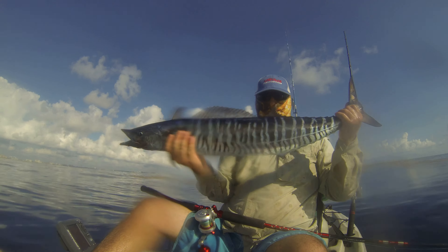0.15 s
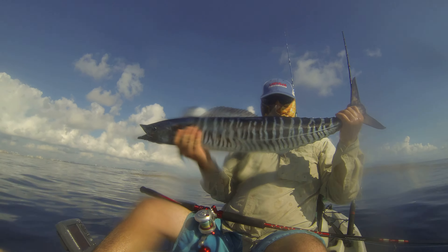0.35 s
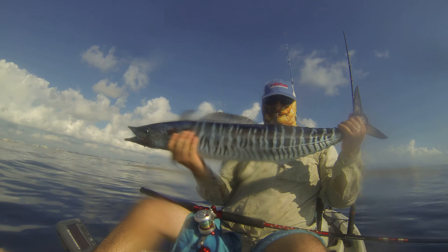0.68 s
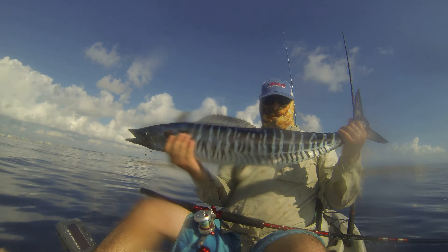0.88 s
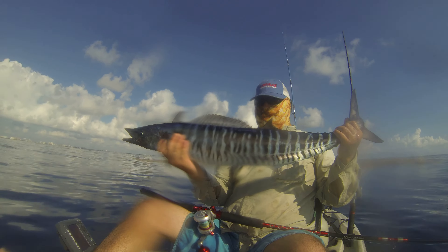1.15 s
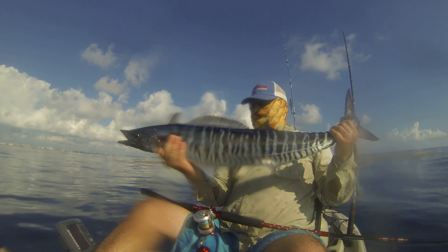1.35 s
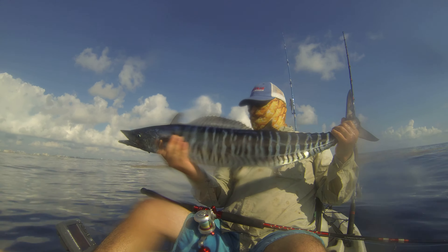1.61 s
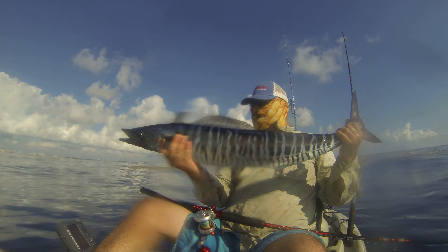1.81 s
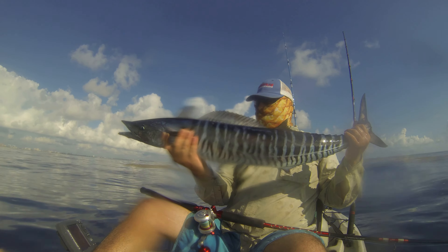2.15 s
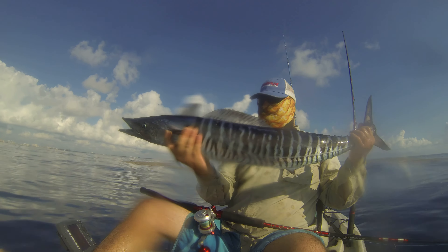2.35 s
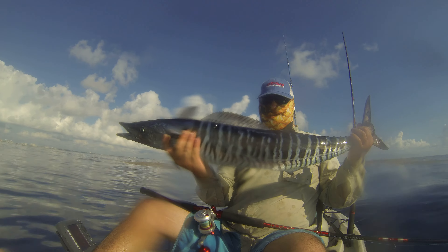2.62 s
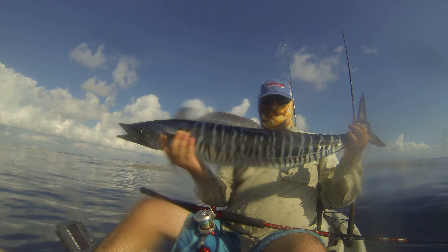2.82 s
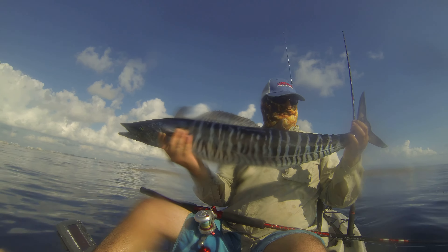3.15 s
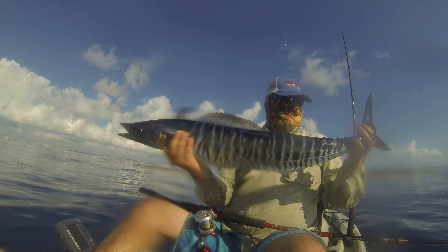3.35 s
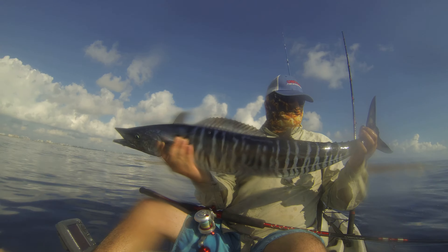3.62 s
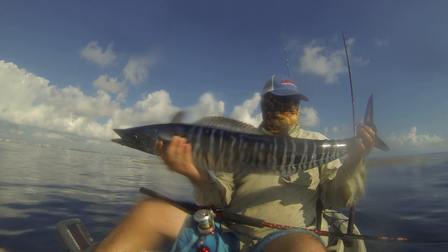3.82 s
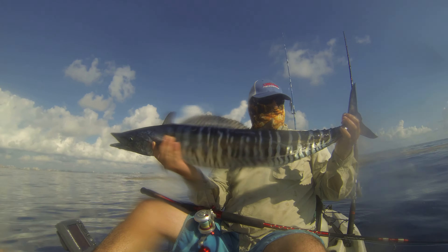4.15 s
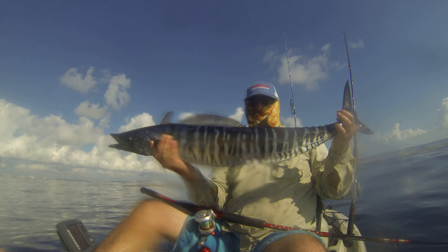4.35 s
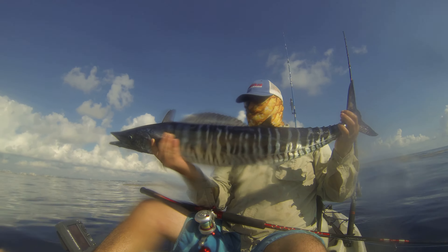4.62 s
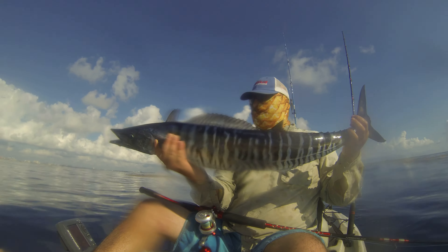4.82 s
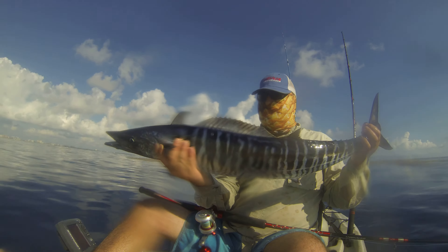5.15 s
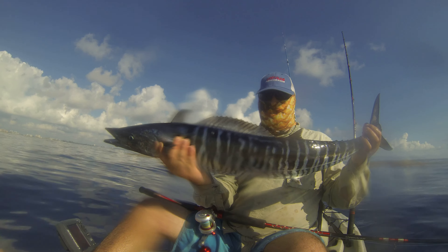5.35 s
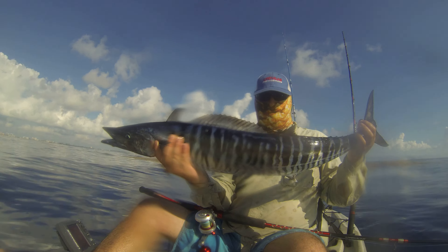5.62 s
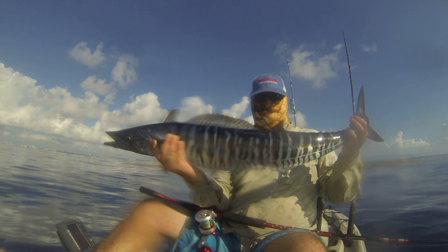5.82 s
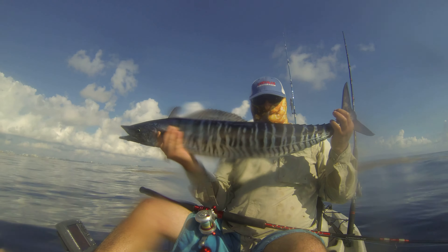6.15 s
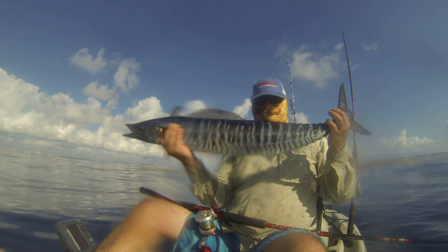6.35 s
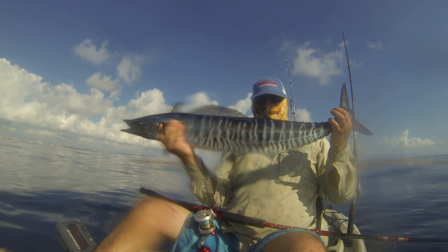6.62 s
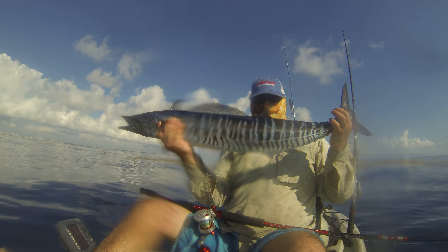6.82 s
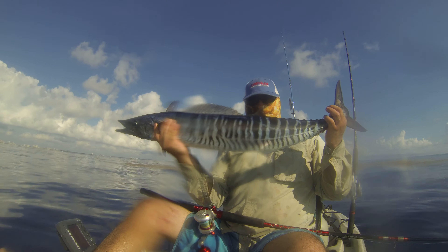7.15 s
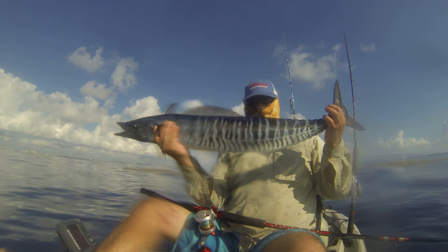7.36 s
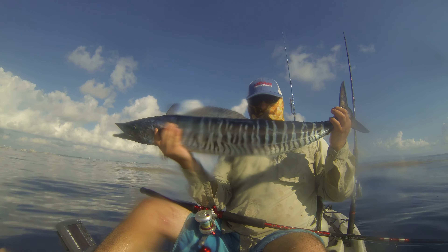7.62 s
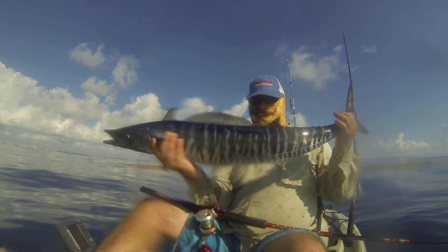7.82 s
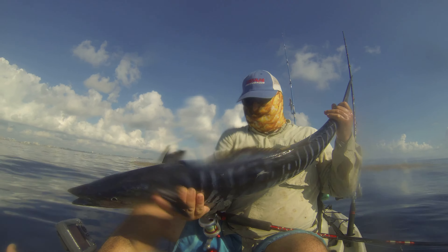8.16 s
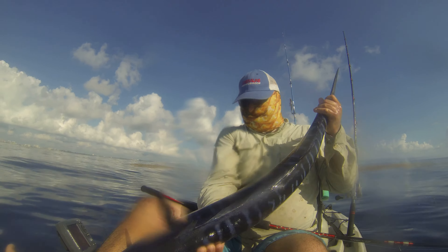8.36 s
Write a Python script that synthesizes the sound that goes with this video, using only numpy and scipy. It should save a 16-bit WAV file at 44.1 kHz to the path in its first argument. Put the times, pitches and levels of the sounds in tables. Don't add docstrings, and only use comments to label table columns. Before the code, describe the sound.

On a small hollow plastic boat at sea, a low motor-like hum runs throughout with faint water lapping. Light knocks come early, then a quieter stretch, then a dense burst of heavy, dull thumps and gear taps around the middle, ending with more bumps and a late knock. The sealed microphone, fixed to the hull, makes everything muffled and bassy, with faint hiss.

```python
import sys
import numpy as np
from scipy import signal
from scipy.fft import rfft, irfft
from scipy.io import wavfile
from scipy.ndimage import uniform_filter1d

SR = 44100
rng = np.random.default_rng(int(sys.argv[2]) if len(sys.argv) > 2 else 0)


def decibels_to_gain(level_db):
    exponent = np.asarray(level_db, float) / 20
    return 10 ** exponent


def master(y):
    cut = np.clip(np.atleast_2d(y).T, -1, 1)
    pcm = np.round(cut * 32767)
    wavfile.write(sys.argv[1], SR, pcm.astype(np.int16))


N = 374380


def rms_one(x):
    return x / np.sqrt(np.mean(x ** 2) + 1e-20)


def in_time(rows):
    s, *columns = np.transpose(rows)
    return [np.interp(np.arange(N) / SR, s, c) for c in columns]


def drift(rate_hz):
    r = np.exp(-80 * np.pi * rate_hz / SR)
    noise = rng.standard_normal(N // 40 + 2002)
    slow = signal.lfilter([1], [1, -2 * r, r * r], noise)[2000:]
    return np.interp(np.arange(N) / 40, np.arange(len(slow)), rms_one(slow - slow.mean()))


def ring(drive, hz, t60_s):
    r, w = decibels_to_gain(-60 / (t60_s * SR)), 2 * np.pi * hz / SR
    return signal.lfilter([0, np.sin(w)], [1, -2 * r * np.cos(w), r * r], drive + 1e-18)


def add(out, s, sound):
    i = round(max(s, 0) * SR)
    out[i:i + len(sound)] += sound[:N - i]


def filtered(x, order, hz, kind="low"):
    return signal.sosfilt(signal.butter(order, hz, kind, fs=SR, output="sos"), x)


FRAME_HZ = 14.985


def gate(spans_s):
    inside = np.arange(N) / SR % (1 / FRAME_HZ)
    return uniform_filter1d(sum(1. * (inside > a) * (inside < b) for a, b in spans_s), size=40)


# (frequency [Hz], density [dB per Hz])
HISS_SPECTRUM = [(100, -36.5), (160, -9), (450, -17), (1000, -20), (1600, -27), (3000, -31.5), (5000, -36),
                 (7500, -39), (10000, -43.5), (12800, -46.5), (13300, -42.5), (14000, -51.5),
                 (15600, -60.5)]
# (start [s], end [s])
WHINE_SPANS = [(.0305, .0472), (.0498, .0668)]
BUZZ_SPANS = [(.017, .0235), (.0245, .031)]
# (frequency [Hz], level [dB rms])
WHINE_LINES = [(7472, -71), (14947, -73.5)]
HISS_DB = -71
BUZZ_HZ, BUZZ_WIDTH_HZ, BUZZ_DB, BUZZ_LIFT_DB = 3255, 350, -79, 6


def camera():
    hz = np.maximum(np.arange(N // 2 + 1) * SR / N, 1)
    table_hz, table_db = np.transpose(HISS_SPECTRUM)
    spectrum = rfft(rng.standard_normal(N)) * decibels_to_gain(np.interp(np.log(hz), np.log(table_hz), table_db))
    hiss = irfft(spectrum, N) / np.std(irfft(spectrum * (hz > 1600), N))

    edges_hz = [BUZZ_HZ - BUZZ_WIDTH_HZ / 2, BUZZ_HZ + BUZZ_WIDTH_HZ / 2]
    buzz = rms_one(filtered(rng.standard_normal(N), 1, edges_hz, "band"))
    buzz *= decibels_to_gain(BUZZ_DB + gate(BUZZ_SPANS) * (BUZZ_LIFT_DB + 1.8 * drift(20)))

    t = np.arange(N) / SR + 0.0022 * np.cumsum(drift(25)) / SR
    whine = sum(decibels_to_gain(db + 1) * np.sin(2 * np.pi * f * t) for f, db in WHINE_LINES)
    return decibels_to_gain(HISS_DB) * hiss + buzz + gate(WHINE_SPANS) * whine


# (time [s], impeller tone [dB], shaft tone [dB])
PUMP_LEVELS = [(0, -38, -59), (.4, -47.5, -56), (.85, -48, -50), (1.15, -35, -45), (1.4, -42.5, -47),
               (1.7, -43, -40.5), (2, -44, -52), (2.75, -43, -52), (2.9, -48, -50.5), (3.7, -51, -54.5),
               (4.5, -47.5, -48.5), (5.6, -44.5, -49.5), (6.25, -46, -45), (6.4, -42.5, -58),
               (6.95, -35.5, -45), (7.3, -39.5, -47), (7.5, -42, -48), (8.49, -45.5, -46)]
# (multiple of shaft speed, level [dB])
PUMP_HARMONICS = [(3, -10), (4, -25.5), (5, -22.5), (6, -33.5), (7, -24.5), (8, -26), (9, -30.5), (10, -30),
                  (11, -45), (12, -31.5), (13, -36.5), (14, -33)]
SHAFT_HZ = 43.94
PUMP_BUZZ_DB, PUMP_BUZZ_FOLLOWS, IMPELLER_MEAN_DB = -43.5, .2, -40


def pump():
    impeller_db, shaft_db = in_time(PUMP_LEVELS)
    buzz_db = PUMP_BUZZ_DB + PUMP_BUZZ_FOLLOWS * (impeller_db - IMPELLER_MEAN_DB)
    turn = 2 * np.pi * np.cumsum(SHAFT_HZ + 0.067 * drift(2.5)) / SR
    buzz = np.zeros(N)
    for k, db in PUMP_HARMONICS:
        waver_db = min(k - 2, 3) * drift(2.0)
        buzz += decibels_to_gain(db + waver_db) * np.sin(k * turn + rng.uniform(0, 6.77))
    shaft = decibels_to_gain(shaft_db) * np.sin(turn)
    impeller = decibels_to_gain(impeller_db) * np.sin(2 * turn + 0.92)
    return np.sqrt(2) * (shaft + impeller + decibels_to_gain(buzz_db) * buzz)


# (frequency [Hz], level [dB], t60 [s])
BELLY_MODES = [(150, 9.5, 0.13), (231, 0, 0.16), (258, 0.5, 0.16)]
WALL_MODES = [(319, 12.5, 0.059), (332.4, 11, 0.06)]
HATCH_MODES = [(417, -2, 0.074), (480, -1, 0.12)]
MID_MODES = [(600, 0.5, 0.044), (722, -5, 0.069), (830, 0.5, 0.017)]
FITTING_MODES = [(937, 2, 0.062), (1016, 2, 0.055), (1238, 1.5, 0.036), (1360, -7.5, 0.02)]
# (time [s], slaps [dB], heave [dB])
WATER_LEVELS = [(0.0, -47, -61), (0.4, -54, -58.5), (1.13, -59.5, -60), (1.46, -46, -57),
                (1.68, -58, -51.5), (2.48, -57, -66.5), (2.76, -53.5, -63), (3.07, -62.5, -59),
                (3.76, -51.5, -68), (4.2, -43.5, -50.5), (4.7, -48.5, -54.5), (4.92, -57, -61),
                (5.1, -45.5, -57), (5.4, -60.5, -65), (5.9, -48, -53.5), (6.53, -56, -57.5),
                (7.73, -64, -68), (8.49, -55, -51)]
# (frequency [Hz], level [dB], t60 [s])
HULL_MODES = [(52.95, -4, 0.26), (70.4, -10.5, 0.31), (100.3, -1.5, 0.39), (108, -1.5, 0.18),
              (130, -6, 0.14), (144, -14, 0.55)]
HEAVE_HZ, HEAVE_T60_S = 16, .35
LAP_LIMIT_DB, HEAVE_LIMIT_DB = -46, -52
RUSTLE_DB, RUSTLE_FOLLOWS, SLAP_MEAN_DB = -62.5, .25, -59.5


def ring_modes(drive, modes):
    return sum((-1) ** k * decibels_to_gain(db) * ring(drive, hz, t60) for k, (hz, db, t60) in enumerate(modes))


def lapping():
    ring_db, heave_db = in_time(WATER_LEVELS)
    rustle_db = RUSTLE_DB + RUSTLE_FOLLOWS * (ring_db - SLAP_MEAN_DB)

    strength = decibels_to_gain(3.8 * np.minimum(rng.exponential(1, N), 5))
    slaps = strength * rng.choice([-1, 1], N) * (rng.random(N) < 200 / SR)
    hull = filtered(ring_modes(slaps, HULL_MODES), 2, 170)

    heave = filtered(ring(rng.standard_normal(N), HEAVE_HZ, HEAVE_T60_S), 2, 40)

    grit = rng.standard_normal(N) * decibels_to_gain(1.5 * drift(14))
    deck_modes = [*BELLY_MODES, *WALL_MODES, *HATCH_MODES, *MID_MODES, *FITTING_MODES]
    deck = filtered(ring_modes(grit, deck_modes), 4, [200, 1500], "band")

    out = decibels_to_gain(np.minimum(ring_db, LAP_LIMIT_DB) + 6.5) * rms_one(hull)
    out += decibels_to_gain(np.minimum(heave_db, HEAVE_LIMIT_DB) + 11.5) * rms_one(heave)
    return out + decibels_to_gain(rustle_db - 4) * rms_one(deck)


# (start [s], frequency [Hz], level [dB rms], length [s])
RUBS = [
    (0, 1310, -67, 0.15),
    (0.043, 2230, -71.5, 0.16),
    (2.579, 823, -55.5, 0.029),
    (2.613, 705, -62, 0.044),
    (2.696, 600, -55, 0.03),
    (2.769, 280, -57, .06),
    (5.38, 480, -56, 0.059),
    (8.1, 600, -60, 0.044),
]


def scuffs():
    out = np.zeros(N)
    for s, hz, db, length_s in RUBS:
        rub = rng.standard_normal(SR // 4)
        stroke = np.hanning(round(length_s * SR))
        tone = ring(rub, hz, .08)[-len(stroke):]
        add(out, s, decibels_to_gain(db) * stroke * rms_one(tone))
    return out


# (time [s], peak [dB], belly [dB], side wall [dB], fittings [dB])
GEAR_KNOCKS = [(0.0, -38.5, -7, -19, -13), (0.199, -28.5, -18, -8, -20), (0.268, -28, -11, -7, -19),
               (0.321, -30, -12.5, -7, -9.5), (0.904, -38, -3.5, -2, -28), (0.909, -44, -12, -10, -13),
               (1.109, -31, -12, -3, -13), (2.59, -50, 4, -16, -6), (3.801, -35, 4.5, 2.5, -1),
               (4.165, -35.5, 8.5, -3, -16), (4.182, -37, -3.5, -16, -3), (4.236, -37, 0.5, -13, -3.5),
               (4.267, -37.5, -9, -4.5, -17), (4.316, -36, 5.5, -4, -4.5), (4.588, -34, 11.5, 4.5, 0),
               (4.974, -43, 2.5, 6, -10), (5.072, -45, 2.5, -6, -18), (5.665, -40, 4.5, 1, -6),
               (5.71, -43.5, -1, 1.5, -8), (5.835, -35.5, -3, -2, -8), (6.056, -45.5, 12.5, 6.5, -8),
               (7.906, -23, -9, -28, -4.5), (7.917, -36.5, -26, 3, -15)]
# (time [s], peak [dB], belly and side wall [dB])
TACKLE_TAPS = [(0.066, -49, 0.5), (0.335, -49, 10), (1.123, -55, 5), (1.439, -60, -3), (2.447, -47, -1.5),
               (2.75, -53, 5.5), (3.827, -53, 14), (4.36, -46, 1.5), (4.448, -55, 13), (4.473, -62, -7),
               (4.605, -55, 12), (4.64, -56, 12), (5.256, -55.5, 8.5), (5.308, -50, -2), (5.375, -51, -4),
               (5.396, -55, -4), (5.503, -49, -3), (5.599, -53, 0), (5.87, -53, 3.5), (5.931, -55, 5),
               (5.96, -57, -10), (6.045, -49.5, 11.5), (7.935, -42, -5), (8.057, -48.5, 1)]
TAP_HATCH_DB, TAP_FITTINGS_DB = -2, -11.5
HATCH_DB, HATCH_FOLLOWS = -4.5, 0.63
RATTLE_S = .007
CRACK_DB, CRACK_RISE_S, CRACK_T60_S = -13, .004, 0.071
CRACK_LOW_HZ, CRACK_HIGH_HZ, CRACK_TILT_HZ = 160, 1560, 550


def knocks():
    out, t = np.zeros(N), np.arange(SR // 5) / SR
    hits = []
    for s, db, belly_db, wall_db, fittings_db in GEAR_KNOCKS:
        hits.append((s, db, belly_db, wall_db, HATCH_DB + HATCH_FOLLOWS * belly_db, fittings_db))
    for s, db, hollow_db in TACKLE_TAPS:
        hits.append((s, db, hollow_db, hollow_db, TAP_HATCH_DB, TAP_FITTINGS_DB))

    for s, db, belly_db, wall_db, hatch_db, fittings_db in hits:
        rattle = rng.standard_normal(len(t))
        force = 0.83 * rattle * np.exp(-t / RATTLE_S) / np.sqrt(RATTLE_S * SR)
        force[0] += .7

        crack = rattle * (1 - np.exp(-t / CRACK_RISE_S)) * decibels_to_gain(-60 * t / CRACK_T60_S)
        crack = filtered(crack, 2, CRACK_LOW_HZ, "high")
        crack = filtered(filtered(crack, 10, CRACK_HIGH_HZ), 1, CRACK_TILT_HZ)
        add(out, s - .002, decibels_to_gain(db + CRACK_DB) * crack / np.abs(crack).max())

        parts = [(BELLY_MODES, belly_db), (WALL_MODES, wall_db), (HATCH_MODES, hatch_db),
                 (MID_MODES, 0), (FITTING_MODES, fittings_db)]
        modes = [(*mode, part_db) for part, part_db in parts for mode in part]
        for k, (hz, mode_db, t60_s, part_db) in enumerate(modes):
            swell = (1 - np.exp(-t * hz / 1.5)) ** 2
            sound = filtered((-1) ** k * swell * ring(force, hz, t60_s), 4, 1550)
            luck_db = rng.normal(0, 0.4)
            add(out, s - .001, decibels_to_gain(db + mode_db + part_db + luck_db - 3.5) * sound)
    return out


# (time [s], peak [dB], ring [Hz], t60 [s], sway of the mount [dB])
HEAVY_BLOWS = [(0.192, -27, 100, 0.17, -12), (0.269, -26, 96, 0.1, -21), (0.337, -33, 103.7, 0.28, 3),
               (3.803, -14, 101.7, 0.07, -15), (3.818, -12, 90, 0.09, -7), (3.849, -24.5, 96, 0.14, -10.5),
               (4.183, -10.5, 103.6, 0.078, 4), (4.203, -7, 101.5, 0.16, -25.5),
               (4.257, -16, 103, 0.11, -12.5), (4.284, -14.5, 93.5, 0.069, -23),
               (4.316, -13.5, 89.7, 0.062, 5.5), (4.443, -18.5, 99.2, 0.23, -8),
               (4.589, -8, 95.4, 0.13, -3), (4.971, -12.5, 100.6, 0.1, 5.5), (5.009, -23.5, 108, 0.14, -17),
               (4.669, -36, 75.3, 0.14, -0.5), (5.842, -14.5, 110.7, 0.083, 3),
               (5.89, -20.5, 86.6, 0.061, -19.5), (5.045, -37.5, 109, 0.14, 0.1),
               (6.091, -30, 112.7, 0.14, -18), (7.917, -24.5, 108, 0.038, -19),
               (8.033, -29, 91.4, 0.18, -8)]
LEG_SHOVES = [
    (0.758, -31, 93.3, 0.13, 1.1),
    (4.164, -13.5, 109, 0.15, -6),
    (5.730, -24, 96.7, 0.084, -11.5),
    (6.050, -12.5, 109, 0.12, 3.5),
]
# (time [s], peak [dB], ring [Hz])
WAVE_NUDGES = [(0.004, -34.5, 99.3), (0.077, -40, 107), (0.929, -28, 82), (1.111, -38, 91.2),
               (1.467, -35, 87), (1.512, -34, 84), (2.151, -41.5, 106), (2.647, -43, 96), (2.71, -35, 90.6),
               (3.227, -42, 93), (3.889, -31, 93), (3.957, -32.5, 93), (4.025, -34, 89), (4.094, -28, 91.5),
               (4.349, -24, 86.4), (4.388, -26, 88.2), (4.497, -34, 95), (4.636, -25.5, 86.1),
               (4.719, -40, 108), (6.922, -33.5, 103), (5.145, -32, 93.5), (7.415, -34.5, 105.5),
               (5.303, -29.5, 96.3), (5.371, -38.5, 100), (5.621, -36, 105), (5.811, -27.5, 85),
               (6.137, -34.5, 86.66), (7.962, -30.5, 99), (8.092, -33.5, 100.3), (8.383, -34, 98.6)]
# (frequency [Hz], level [dB], t60 [s])
SWAY_MODES = [(50.4, -4.5, 0.11), (68, -6.5, 0.24), (39, -23, 0.39)]
UPPER_HZ, UPPER_DB, UPPER_T60_S = 145.8, -15, 0.18
THUMP_RISE_S, SHOVE_RISE_S, NUDGE_RISE_S = .0075, 0.018, 0.0038
NUDGE_T60_S, NUDGE_SWAY_DB = 0.21, -13


def thumps():
    out, t = np.zeros(N), np.arange(SR // 2) / SR
    blows = [(*row, THUMP_RISE_S) for row in HEAVY_BLOWS]
    blows += [(*row, NUDGE_T60_S, NUDGE_SWAY_DB, NUDGE_RISE_S) for row in WAVE_NUDGES]
    blows += [(*row, SHOVE_RISE_S) for row in LEG_SHOVES]
    for s, db, hz, t60_s, sway_db, rise_s in blows:
        swell = (1 - np.exp(-t / rise_s)) ** 2
        main = swell * decibels_to_gain(-60 * t / t60_s)
        sound = main / main.max() * np.sin(2 * np.pi * hz * t)
        for low_hz, low_db, low_t60_s in SWAY_MODES:
            sway = swell * decibels_to_gain(sway_db + low_db - 60 * t / low_t60_s)
            sound -= sway * np.sin(2 * np.pi * low_hz * t)
        sound += swell * decibels_to_gain(UPPER_DB - 60 * t / UPPER_T60_S) * np.sin(2 * np.pi * UPPER_HZ * t)
        add(out, s - .003, decibels_to_gain(db) * sound)
    return out


def scene():
    return (camera() + lapping() + pump() + scuffs() + knocks() + thumps())[None]


def roll_off(x):
    return signal.sosfilt(signal.butter(12, 15690, fs=SR, output="sos"), x)


def record(dry):
    ease = np.minimum(np.arange(N, 0, -1) / (.006 * SR), 1)
    rounded = 0.81 * np.tanh(dry / 0.82)
    return roll_off(ease * rounded)


dry = scene()
out = record(dry)
master(out)
```